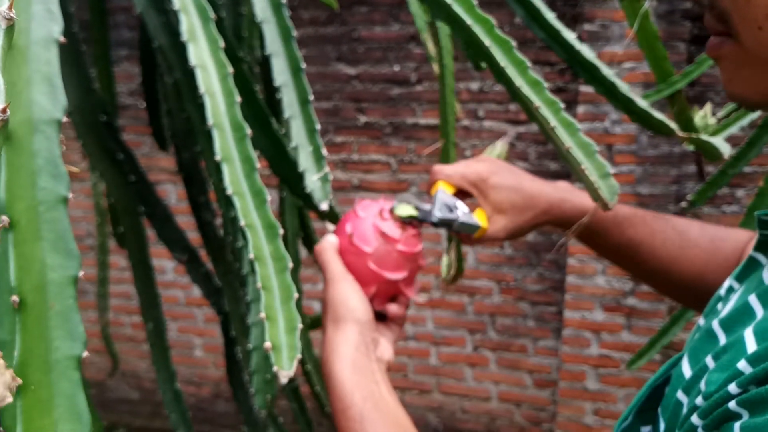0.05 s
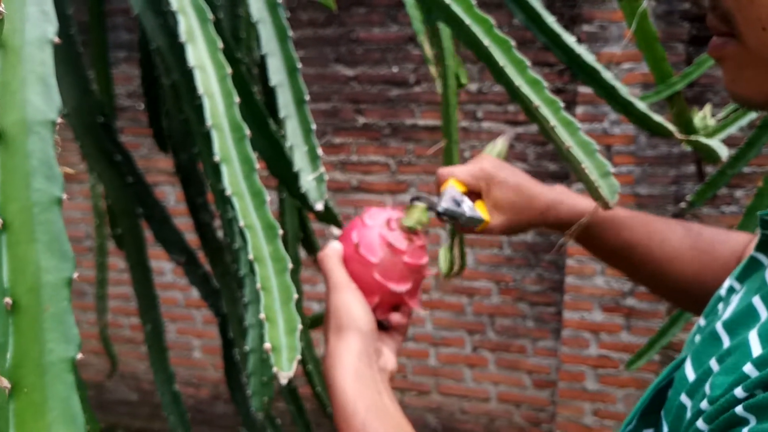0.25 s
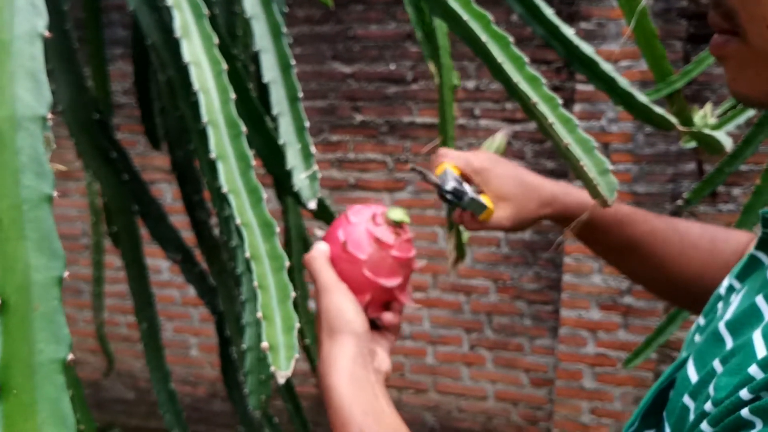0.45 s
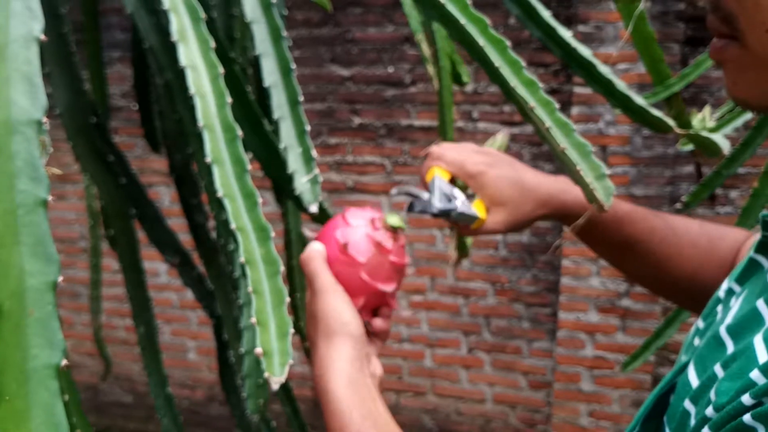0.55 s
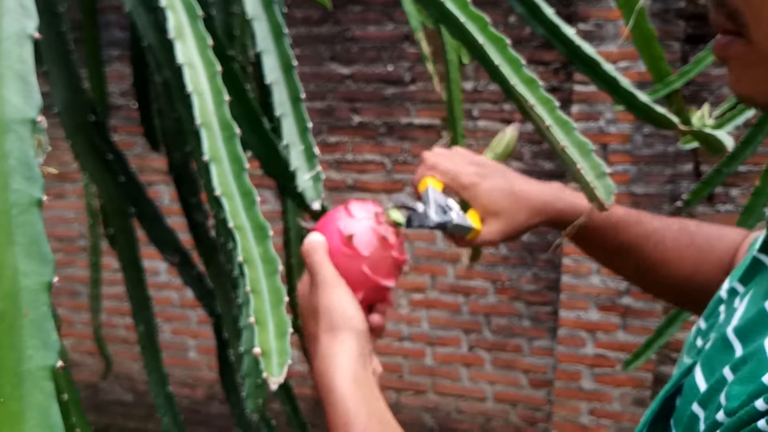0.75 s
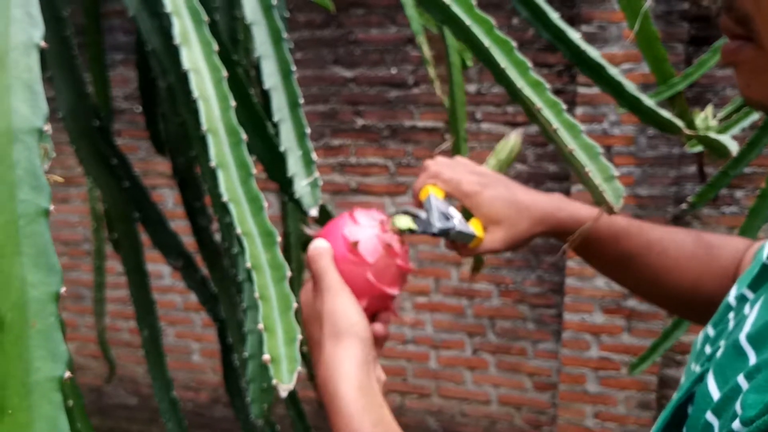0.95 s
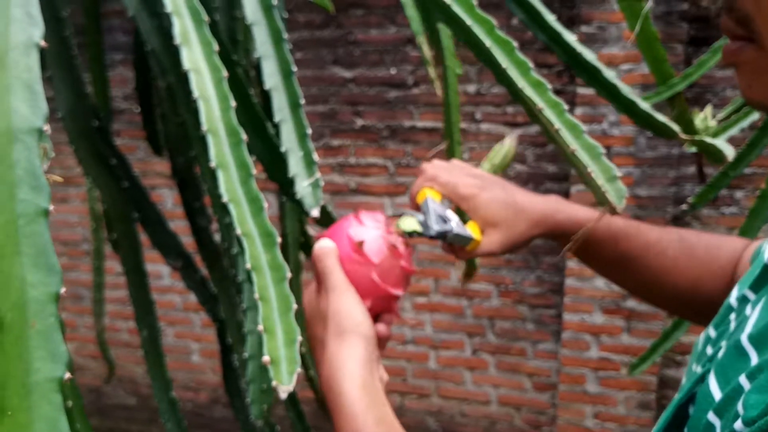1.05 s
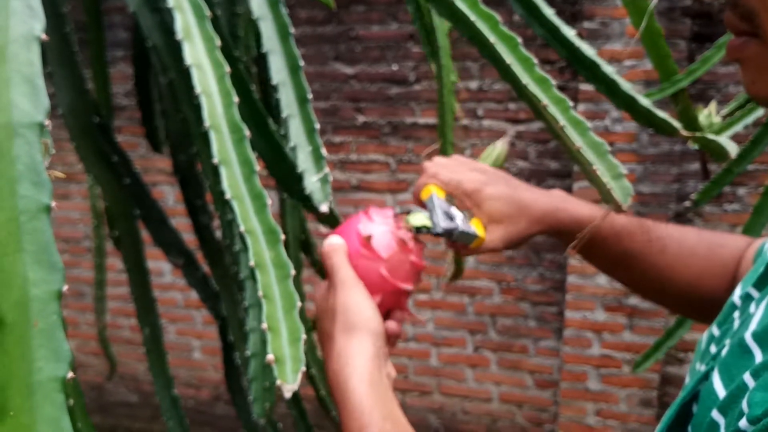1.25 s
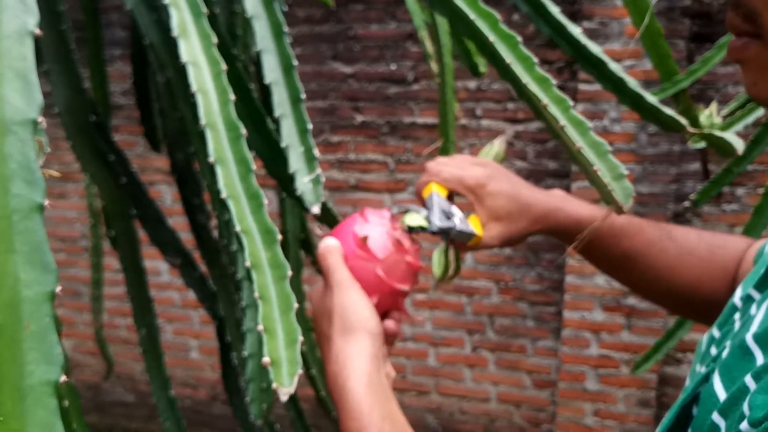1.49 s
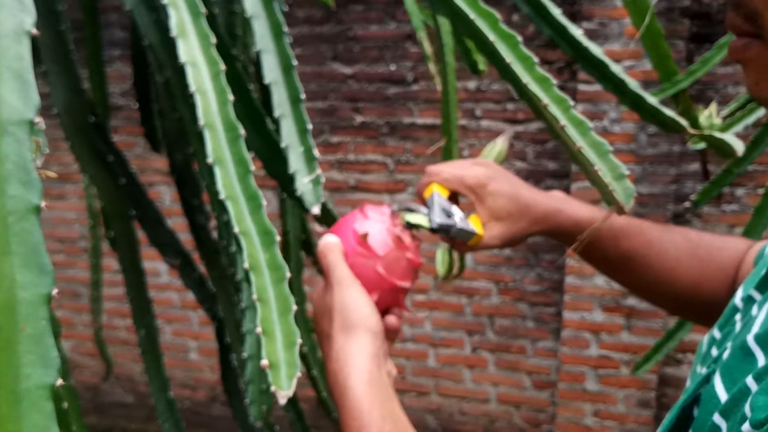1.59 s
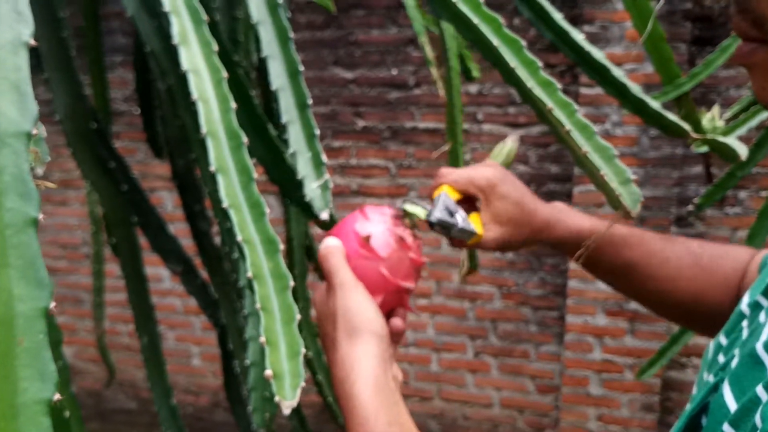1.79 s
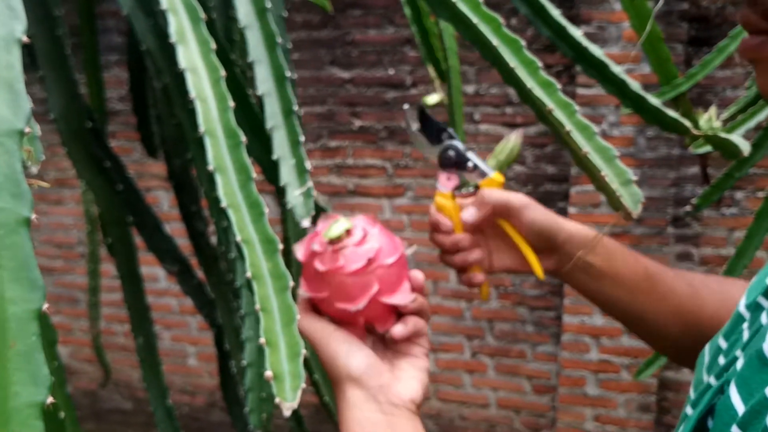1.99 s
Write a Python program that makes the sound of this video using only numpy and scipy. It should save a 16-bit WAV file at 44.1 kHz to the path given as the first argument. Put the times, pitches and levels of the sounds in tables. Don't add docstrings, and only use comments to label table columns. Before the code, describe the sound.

Close garden shears creak, bite and snap sharply, then small birds whistle thinly amid steady insect drone

```python
import sys
import numpy as np
from scipy import signal
from scipy.fft import rfft, irfft, next_fast_len
from scipy.io import wavfile
from scipy.ndimage import map_coordinates

SR = 44100
rng = np.random.default_rng(int(sys.argv[2]) if len(sys.argv) > 2 else 0)


def to_linear_factor(level_db):
    exponent = np.asarray(level_db, float) / 20
    return 10 ** exponent


def wav_record(signal):
    frames = np.transpose(np.atleast_2d(signal))
    bounded = np.clip(frames, -1, 1)
    quanta = np.round(bounded * 32767).astype(np.int16)
    wavfile.write(sys.argv[1], SR, quanta)


N = 88200


def unit(x):
    return x / np.sqrt(np.mean(x ** 2) + 1e-20)


def along(points, hz):
    f, value = np.transpose(points)
    return np.interp(np.log(hz + 1), np.log(f + 1), value)


def wobble(rate):
    knots = rng.standard_normal(int(N * rate / SR) + 4)
    return map_coordinates(knots, [np.arange(N) * rate / SR])


def filtered(x, response):
    m = next_fast_len(x.shape[-1] + 8192)
    spectrum = rfft(x, m) * response(np.fft.rfftfreq(m, 1 / SR))
    return irfft(spectrum, m)[..., :x.shape[-1]]


def causal(gain):
    c = irfft(np.log(gain + 1e-6))
    half = len(c) // 2
    c = c * np.r_[1, 2 * np.ones(half - 1), 1, np.zeros(half - 1)]
    return np.exp(rfft(c))


def peak(f, hz, width):
    return 1j * f * width / (hz * hz - f * f + 1j * f * width)


def add(track, s, x):
    part = track[..., round(s * SR):][..., :x.shape[-1]]
    part += x[..., :part.shape[-1]]


def walls(x):
    # frequency in Hz, t60 in seconds
    wall_t60 = [(500, 0.18), (2000, 0.3), (6000, 0.16), (11000, 0.076), (15000, 0.18)]
    hz, t, z = signal.stft(rng.standard_normal((2, SR // 4)), SR, nperseg=128)
    decay = to_linear_factor(-60 * t / along(wall_t60, hz)[:, None])
    tail = signal.istft(z * decay, SR, nperseg=128)[1]
    late = np.pad(x, (60, 0))
    return signal.fftconvolve(late[None], tail / np.linalg.norm(tail[0]), axes=1)


def ports(x):
    # frequency in Hz, lead of the left port in radians
    lead = [(800, 0), (2000, .7), (5000, 1.15), (9000, 2.05), (15000, 1.8)]
    # frequency in Hz, left over right in dB
    lean = [(700, -1), (1400, -2.5), (2800, 3), (5500, 0), (10000, 5), (14000, 7.5)]

    def response(f):
        left = to_linear_factor(along(lean, f) / 2) * np.exp(.5j * along(lead, f))
        return np.array([left, 1 / left])

    return filtered(x * np.ones((2, 1)), response)


def air():
    # frequency in Hz, density in dB per Hz
    hiss = [(240, -65), (400, -9), (1190, -12), (1890, -15), (3750, -16), (5360, -14.5), (9090, -18),
            (14900, -20.5), (16400, -53)]

    def response(f):
        level_db = along(hiss, np.where((f > 4500) & (f < 9000), 4500, f))
        return to_linear_factor(level_db - 5.76 * (1 + np.tanh((f - 8000) / 500)))

    noise = filtered(rng.standard_normal((2, N)), response)
    return to_linear_factor(-68 + 0.43 * wobble(2.1)) * unit(noise)


def town():
    # frequency in Hz, density in dB per Hz
    rumble = [(13, -59), (22, -34), (64, -7), (108, -4), (204, -8), (307, -11.5), (524, -17), (700, -21),
              (910, -24), (1540, -120)]
    # frequency in Hz, left-right likeness from 0 to 1
    alike = [(60, 0.14), (130, 0.4), (300, 0.03), (700, 0.22)]

    def response(f):
        turn = np.arccos(np.clip(along(alike, f), -1, 1)) / 2
        return to_linear_factor(along(rumble, f)) * [np.cos(turn), np.sin(turn)]

    mid, side = filtered(rng.standard_normal((2, N)), response)
    return to_linear_factor(-66 + wobble(9.3)) * unit(np.array([mid + side, mid - side]))


def thumps():
    # start in seconds, peak level in dB, pitch in Hz, t60 in seconds
    far_thumps = [
        (0.461, -48, 139, 0.15),
        (1.138, -55, 113.4, 0.26),
        (1.391, -65, 142, .03),
        (1.55, -48, 103, 0.094),
        (1.736, -50.5, 93.5, 0.096),
    ]
    out, t = np.zeros((2, N)), np.arange(SR // 3) / SR
    for s, db, hz, t60 in far_thumps:
        swell = to_linear_factor(db - 60 * t / t60) * (1 - np.exp(-t / 0.012))
        add(out, s, swell * np.sin(2 * np.pi * hz * t))
    return out


def insects():
    # pitch in Hz, width in Hz, level in dB, clicks a second
    choirs = [
        (5430, 400, -61, 4000),
        (6500, 1100, -69, 4000),
        (7400, 600, -78, 4000),
        (15100, 1600, -83, 2500),
    ]
    # time in seconds, level of the hum in dB
    hum = [(0.45, -66), (0.69, -66), (1.338, -66.5), (1.49, -65), (2.0, -67.5)]
    # time in seconds, level of the choirs just above the hum in dB
    upper = [(0, 1), (.5, -0.5), (.8, -5.5), (1.2, -0.5), (1.6, -3.5), (1.802, -29), (2, 7)]
    t = np.arange(N) / SR
    s, level = np.transpose(hum)
    hum_db = np.interp(t, s, level - level.mean())
    upper_db = np.interp(t, *np.transpose(upper))
    out = np.zeros((2, N))
    for hz, width, db, rate in choirs:
        clicks = (rng.random((2, N)) < rate / SR) * rng.standard_normal((2, N))
        song = unit(filtered(clicks, lambda f: peak(f, hz, width) ** 3))
        swell_db = upper_db if 6000 < hz < 9000 else hum_db
        out += to_linear_factor(db + swell_db + .5 * wobble(5) + .7 * wobble(40)) * song
    return out


def birds():
    # start in seconds, length in seconds, level in dB, first pitch in Hz, last pitch in Hz
    calls = [
        (0.477, 0.051, -84, 7270, 7300),
        (0.996, 0.094, -75, 6400, 6950),
        (1.303, 0.039, -76, 7100, 6660),
        (1.346, 0.095, -71, 6870, 6880),
        (1.54, 0.055, -80, 7300, 7450),
        (1.681, 0.19, -69.5, 6280, 6330),
        (1.923, 0.069, -72.5, 7950, 7160),
        (1.957, 0.093, -70, 7290, 6980),
        (1.963, 0.062, -70, 7630, 7700),
        (1.967, 0.05, -67.5, 7540, 6940),
    ]
    trill_db, waver, pan_db, wet_db = 3, .012, 1.5, 5
    clear = .45
    out = np.zeros((2, N))
    for s, length, db, first_hz, last_hz in calls:
        u = np.arange(int(length * SR)) / (length * SR)
        n = len(u)
        hz = (first_hz + (last_hz - first_hz) * u) * (1 + waver * wobble(258)[:n])
        swell = np.clip(u / 0.056, 0, 1) * (1 - u) ** .5
        trill = to_linear_factor(trill_db * wobble(60)[:n])
        rasp = clear + (1 - clear) * wobble(300)[:n]
        call = to_linear_factor(db + 9) * swell * trill * rasp * np.sin(2 * np.pi * np.cumsum(hz) / SR)
        add(out, s, call * to_linear_factor([[pan_db], [-pan_db]]))
        add(out, s, to_linear_factor(wet_db) * walls(call))
    return out


def body_peaks(f):
    # pitch in Hz, width in Hz, gain in dB
    resonances = [(860, 80, 11), (1500, 100, 9), (1900, 260, 8), (2860, 250, 6), (3430, 250, 11),
                  (5500, 200, 5), (6640, 250, 6), (7400, 200, 6), (15200, 900, 8)]
    return 1 + sum(to_linear_factor(db) * abs(peak(f, hz, width)) ** 2 for hz, width, db in resonances)


def through_body(x, tilt_db):
    # frequency in Hz, density in dB per Hz
    tool = [(350, -59.5), (700, -24.5), (950, -16.5), (2000, -15), (4300, -12.5), (6600, -6), (8800, -14.5),
            (13500, -22.5)]

    def response(f):
        tilt = tilt_db * np.log2(np.minimum(f, 7500) / 4000 + .01)
        return causal(to_linear_factor(along(tool, f) + tilt) * body_peaks(f))

    return filtered(x, response)


def share(x):
    own = .4
    return (1 - own) * x[0] + own * x[1:]


def place(out, s, hit, tail_db):
    blurred = filtered(hit[0], lambda f: (2 / body_peaks(f)) ** .7)
    add(out, s, ports(hit))
    add(out, s, to_linear_factor(tail_db) * walls(blurred))


def slips():
    # time of the peak in seconds, peak level in dB, pitch in Hz, cycles to the peak
    pings = [(.0115, -53, 5500, 9), (.0250, -48, 6200, 3), (.0654, -47, 6300, 2), (.0695, -46, 6600, 3),
             (.0906, -34, 6300, 3), (.0912, -47, 1750, 4), (.1283, -46, 6500, 3), (.1292, -50, 8500, 3),
             (.1892, -47, 5000, 4), (.3093, -51, 8500, 3), (.3095, -54, 2000, 2), (.0915, -42, 5000, 5),
             (1.8797, -50, 8300, 2), (.045, -52, 6400, 5), (.381, -52, 7000, 3), (.3963, -38, 5300, 5),
             (.4012, -42, 5500, 5), (.4033, -31.5, 5750, 6), (.409, -48, 5700, 8), (.3912, -46, 5000, 4),
             (.3912, -54, 3400, 3), (.3922, -56, 1400, 2), (.3972, -52, 7800, 3), (.3937, -48, 5200, 5),
             (.3980, -44, 5300, 4), (.4058, -44, 5700, 5), (.590, -48, 5450, 6), (1.158, -58, 7500, 2),
             (1.299, -53, 7000, 2), (1.4761, -51, 10200, 2), (1.4908, -50, 9900, 2), (1.727, -60, 7800, 2),
             (.2279, -19.5, 6650, 6), (.2203, -23, 7400, 4), (1.850, -66, 1700, 1), (1.885, -68, 2050, 6),
             (1.8800, -45, 5700, 8), (1.887, -50, 6200, 6), (1.895, -50, 6300, 6)]
    out, t = np.zeros((2, N)), np.arange(SR // 4) / SR
    for s, db, hz, cycles in pings:
        u = t * hz / max(cycles, 1)
        hit = to_linear_factor(db + 3) * (u * np.exp(1 - u)) ** 2 * np.sin(2 * np.pi * hz * t)
        add(out, s - cycles / hz, ports(hit))
        add(out, s, to_linear_factor(-11) * walls(hit))
    return out


def tears():
    # start in seconds, length in seconds
    spans = [(.0895, .004), (.092, .016), (.125, .008), (.2148, .008), (.383, .04), (.306, .012),
             (.11, .07), (.188, .025), (1.15, .07), (1.877, .035), (.2215, .011), (.392, .03)]
    # level in dB, brightness in dB per octave
    strengths = [(-41, 0), (-50.5, -1.5), (-47.5, 3.5), (-25.5, 3), (-69, 2), (-55, -0.5), (-65, -3),
                 (-53, 2), (-68, -0.5), (-65.5, -0.5), (-25, 3.5), (-57, -3)]
    rate, spread_db = 4000, 2.5
    out, t = np.zeros((2, N)), np.arange(SR // 4) / SR
    for (s, length), (db, tilt_db) in zip(spans, strengths):
        chance, sign, strength = rng.random((3, 3, len(t)))
        fibres = (chance < rate / SR) * np.sign(sign - .5) * to_linear_factor(-spread_db * np.log(strength + 1e-9))
        crackle = unit(through_body(share(fibres), tilt_db))
        swell = abs(np.sin(np.pi * np.clip(t / length, 0, 1))) ** 0.36
        place(out, s, to_linear_factor(db) * crackle * swell, -10)
    return out


def snaps():
    # start in seconds, peak level in dB, brightness in dB per octave, tail level in dB
    blows = [(.0248, -48, 7, -9), (.0650, -49, 9, -8), (.0692, -50, 9, -12), (.1888, -39, 9, -6),
             (.1995, -47, -8, -6), (.2052, -45, 3, -7), (.2118, -37, 2, -5), (.3085, -42, -4, -5),
             (.3908, -45, 3, -8), (1.8490, -54, 6, -8), (1.8793, -43, 12, -6), (.0903, -29, 1, -10),
             (.2158, -20, -1, -10), (.2198, -14, 0, -11), (.2274, -17, 1, -6)]
    # blade pitch in Hz, level in dB, t60 in seconds
    steel = [(3030, -22, 0.2), (3750, -10, 0.014), (6040, -15, .1), (5740, 8.5, 0.039), (7500, -2, 0.15),
             (7470, 4, 0.12), (8110, 7, 0.056), (13000, -26, 0.091)]
    blow_t60, longest_t60, ring_db = .004, .15, -28
    out, t = np.zeros((2, N)), np.arange(SR // 4) / SR
    for s, db, tilt_db, tail_db in blows:
        burst = to_linear_factor(-60 * t / blow_t60) * share(rng.standard_normal((3, len(t))))
        blow = through_body(burst, tilt_db)
        ring = np.zeros(len(t))
        for hz, level_db, t60 in steel:
            decay_db = -60 * t / min(t60, longest_t60)
            ring += to_linear_factor(level_db + rng.normal(0, 2.7) + decay_db) * np.sin(2 * np.pi * hz * t)
        hit = to_linear_factor(db + 1) * (blow / abs(blow).max() + to_linear_factor(ring_db) * ring)
        place(out, s, hit, tail_db)
    return out


def scene():
    garden = air() + town() + thumps()
    shears = slips() + tears() + snaps()
    return garden + insects() + birds() + shears


def low_pass(x):
    return signal.sosfilt(signal.butter(12, 16810, fs=SR, output="sos"), x)


def record(dry):
    top_hz, edge_hz, over_top_db = 15560, 40, -24
    mix = filtered(dry, lambda f: to_linear_factor(over_top_db * (1 + np.tanh((f - top_hz) / edge_hz)) / 2))
    return low_pass(mix)


dry = scene()
out = record(dry)
wav_record(out)
```